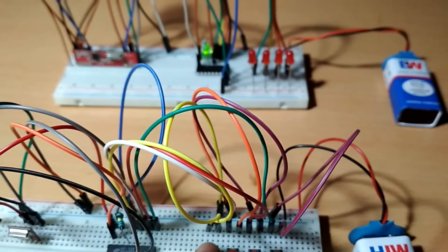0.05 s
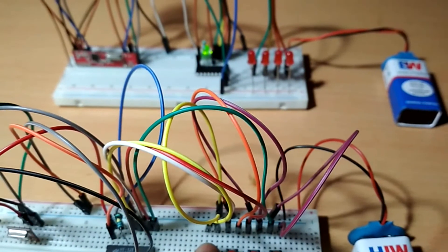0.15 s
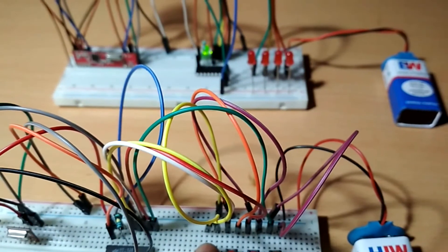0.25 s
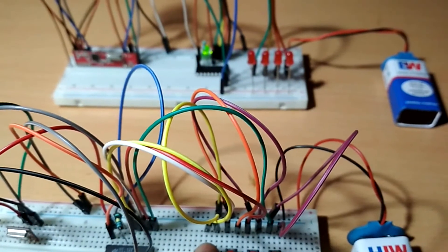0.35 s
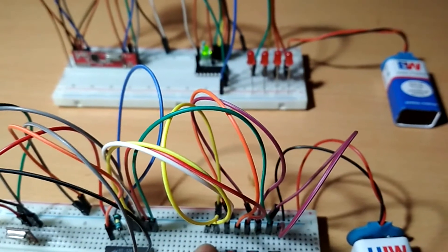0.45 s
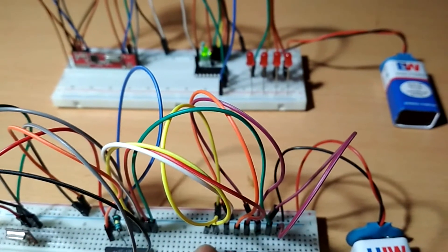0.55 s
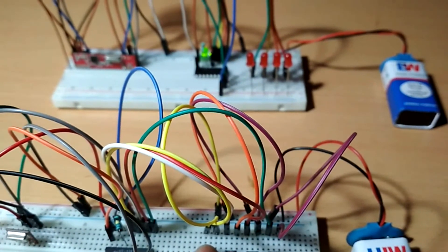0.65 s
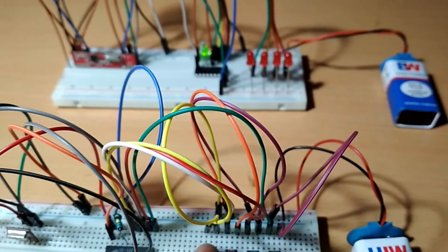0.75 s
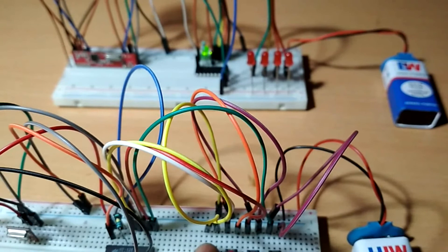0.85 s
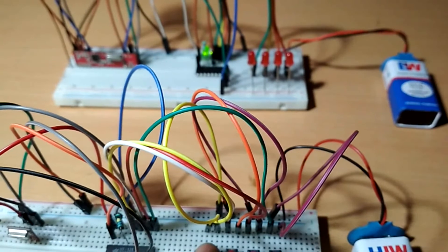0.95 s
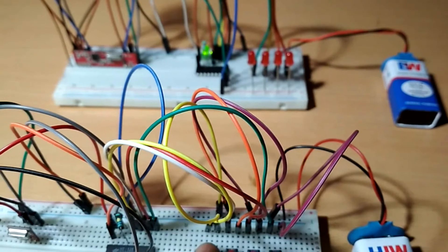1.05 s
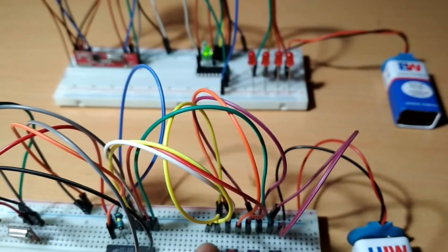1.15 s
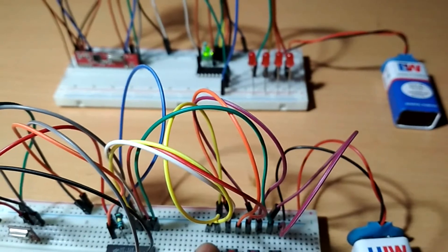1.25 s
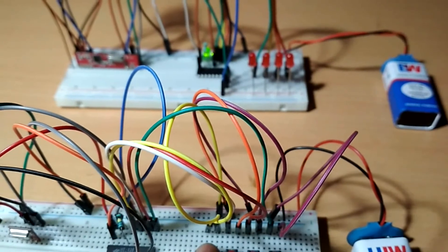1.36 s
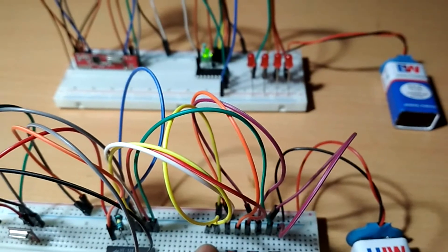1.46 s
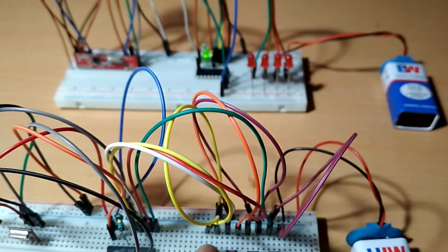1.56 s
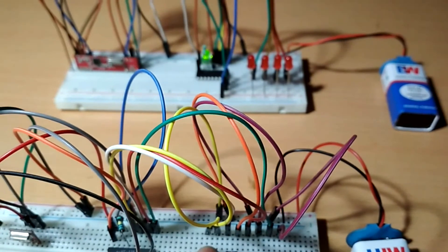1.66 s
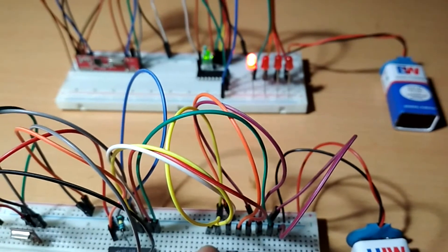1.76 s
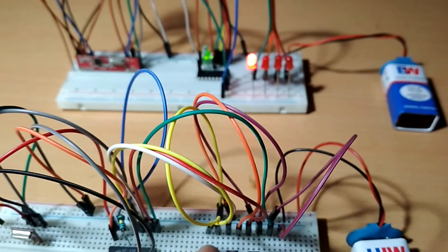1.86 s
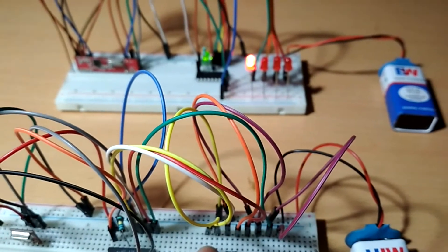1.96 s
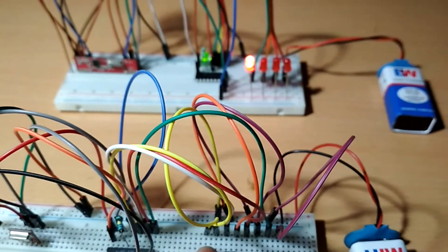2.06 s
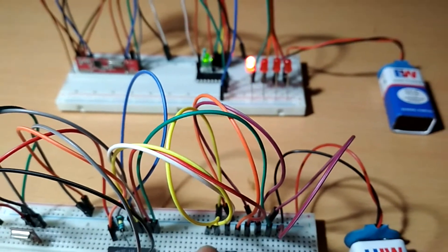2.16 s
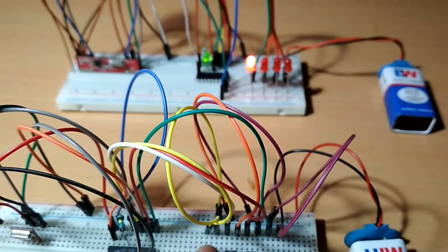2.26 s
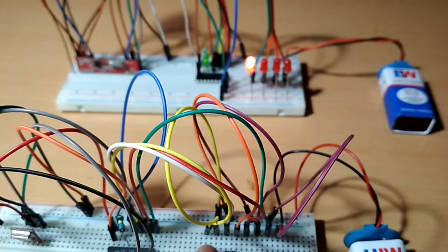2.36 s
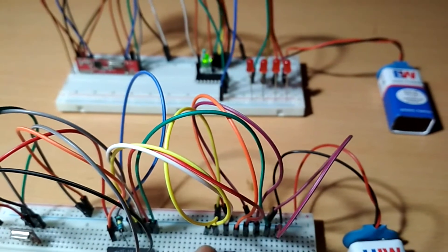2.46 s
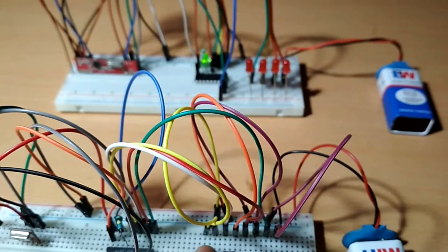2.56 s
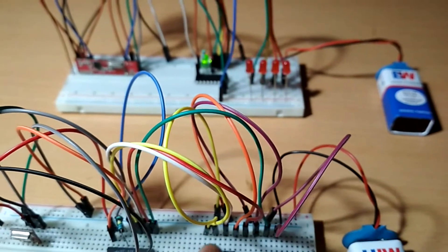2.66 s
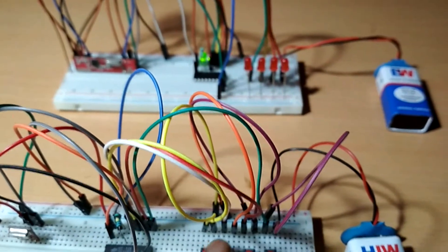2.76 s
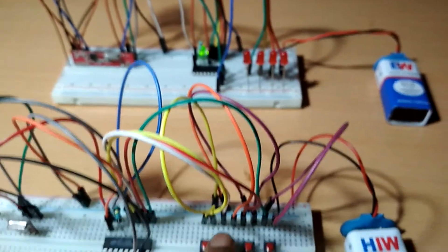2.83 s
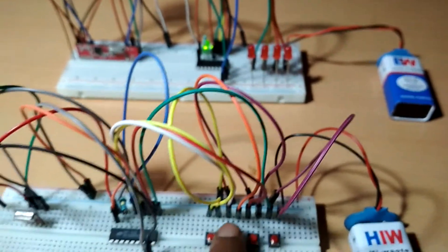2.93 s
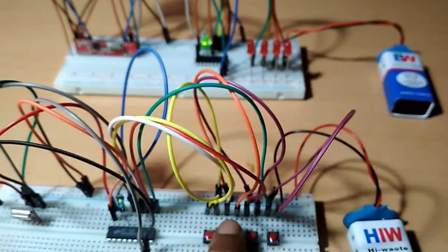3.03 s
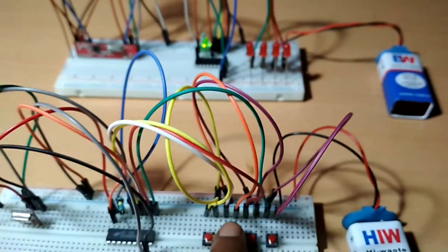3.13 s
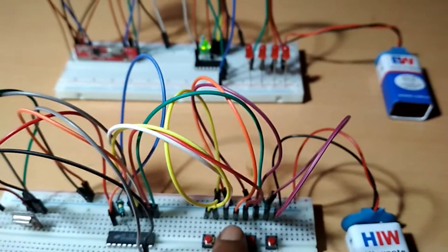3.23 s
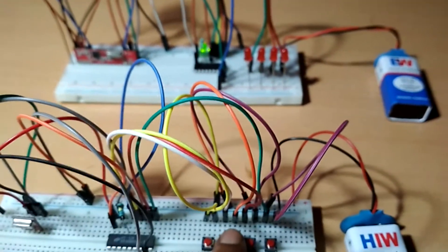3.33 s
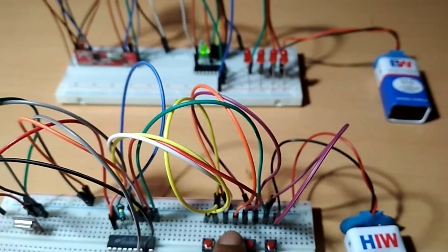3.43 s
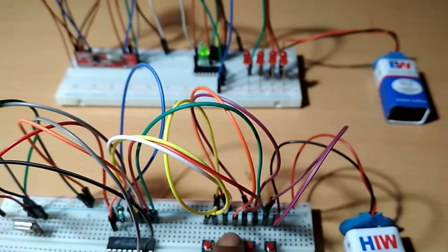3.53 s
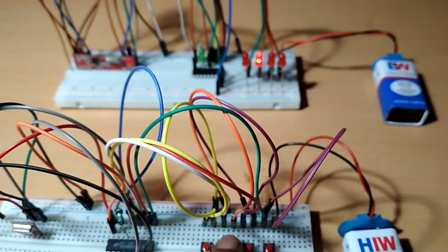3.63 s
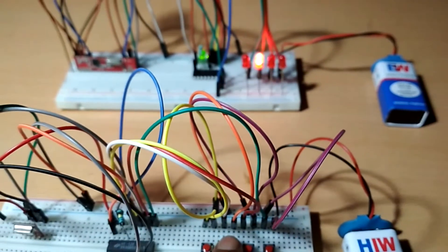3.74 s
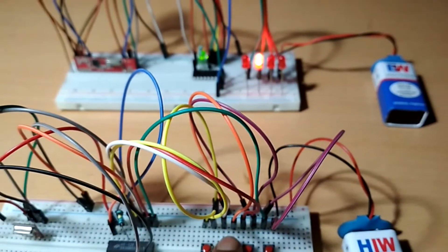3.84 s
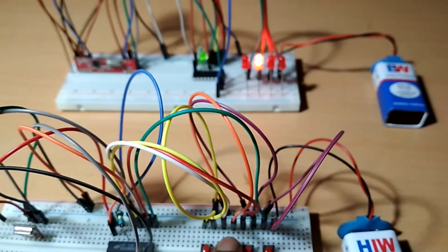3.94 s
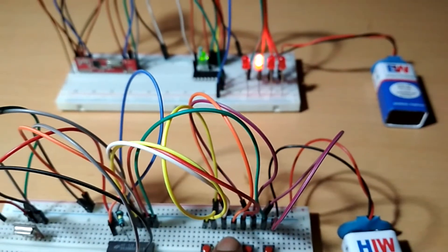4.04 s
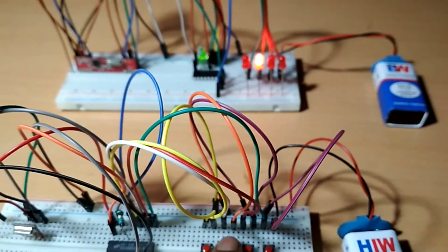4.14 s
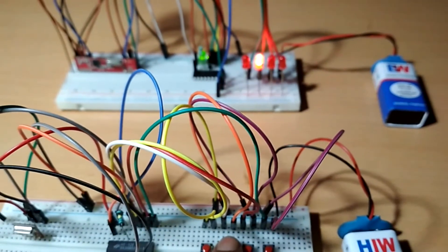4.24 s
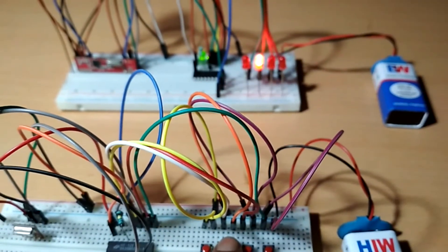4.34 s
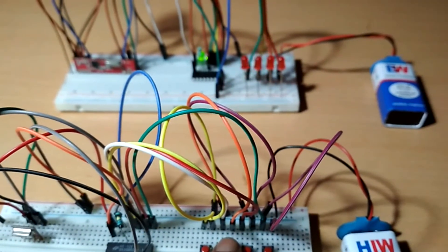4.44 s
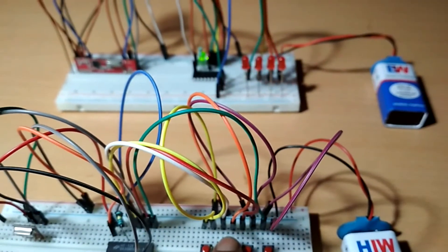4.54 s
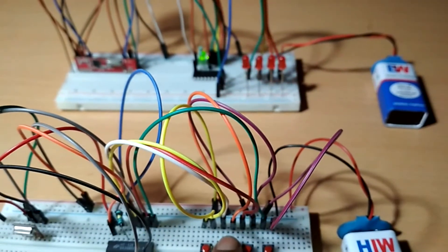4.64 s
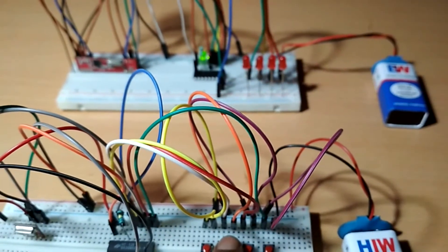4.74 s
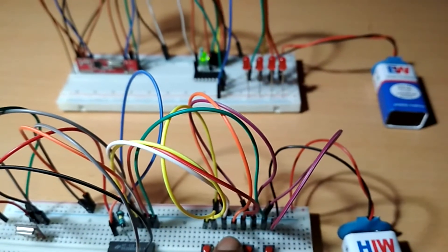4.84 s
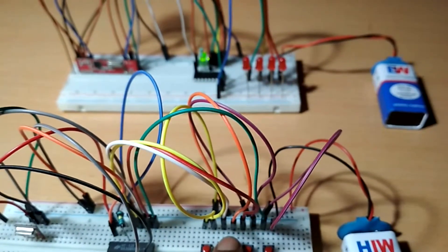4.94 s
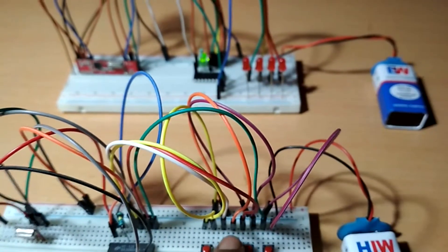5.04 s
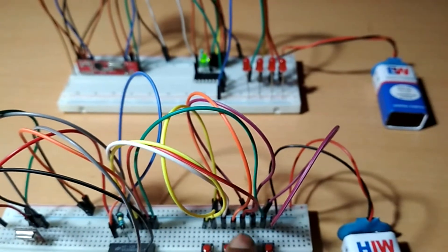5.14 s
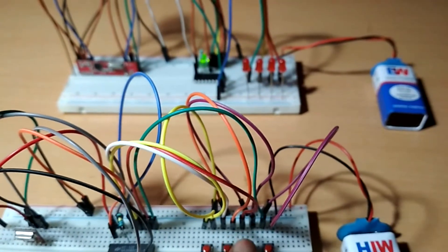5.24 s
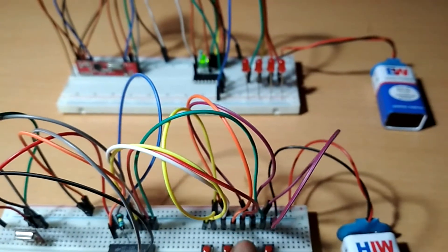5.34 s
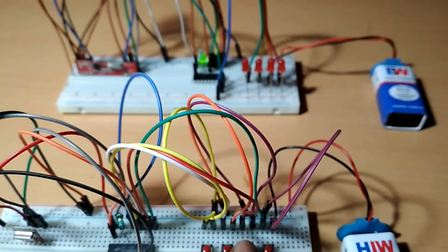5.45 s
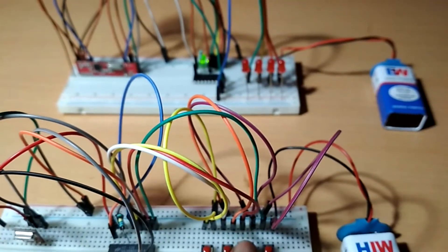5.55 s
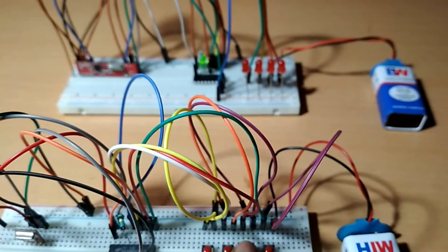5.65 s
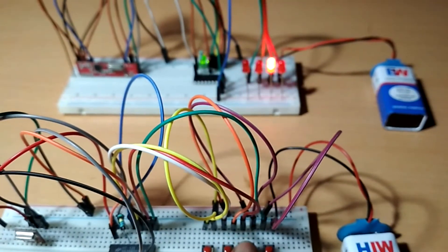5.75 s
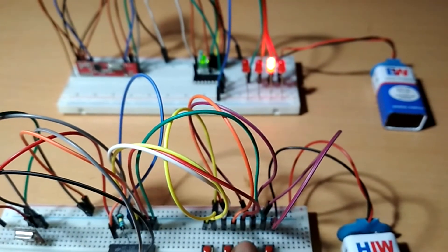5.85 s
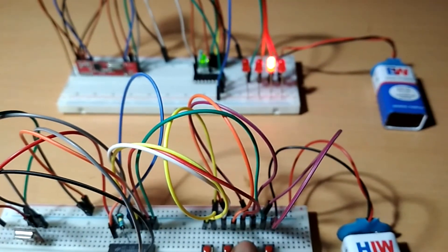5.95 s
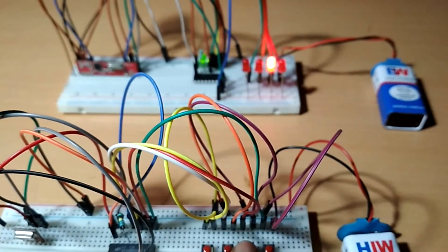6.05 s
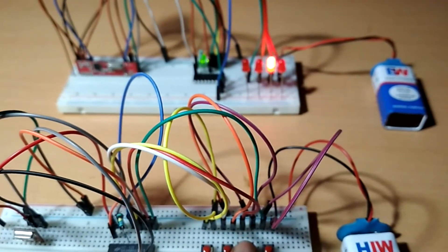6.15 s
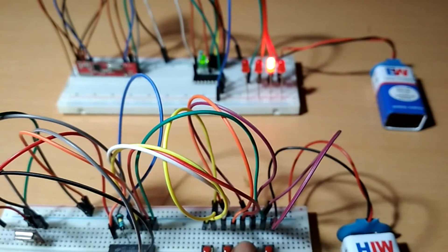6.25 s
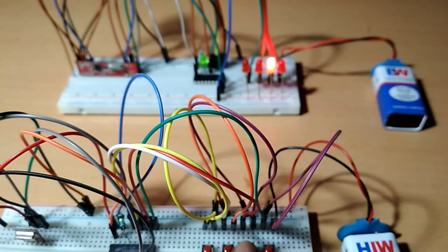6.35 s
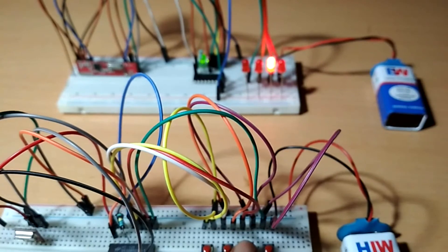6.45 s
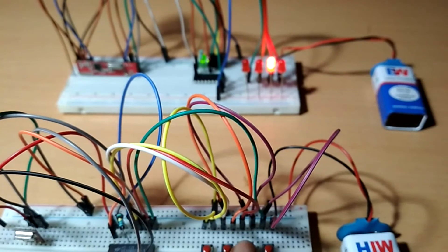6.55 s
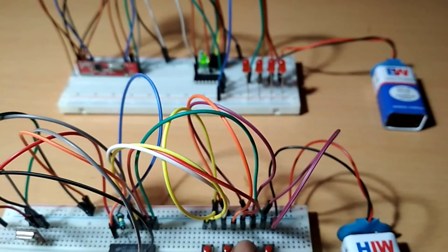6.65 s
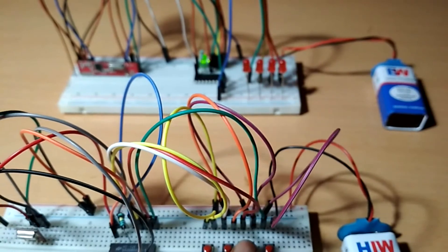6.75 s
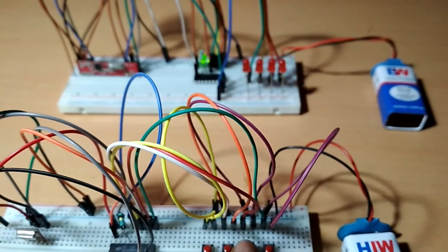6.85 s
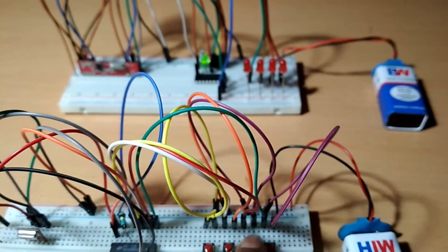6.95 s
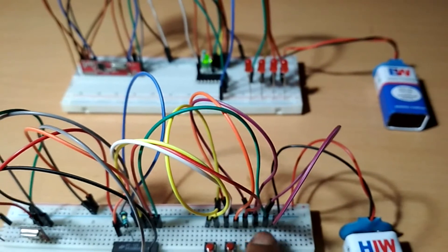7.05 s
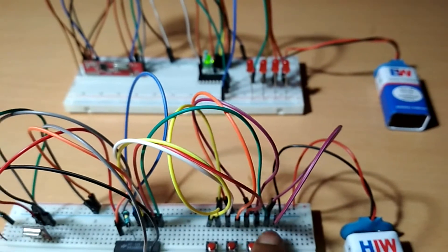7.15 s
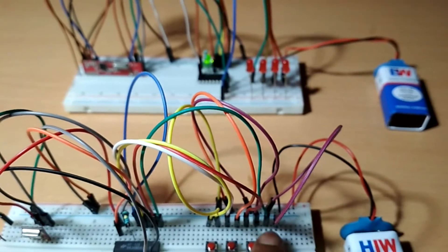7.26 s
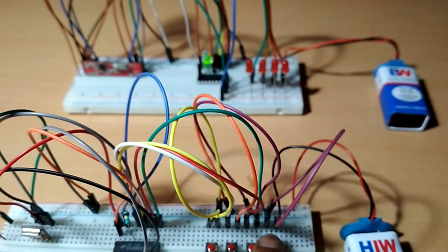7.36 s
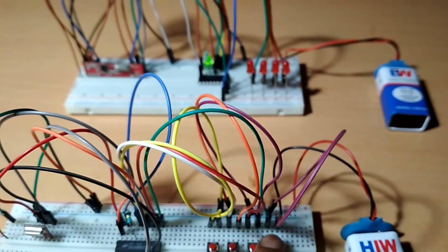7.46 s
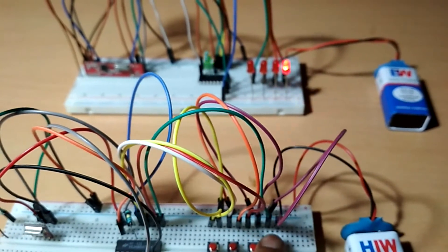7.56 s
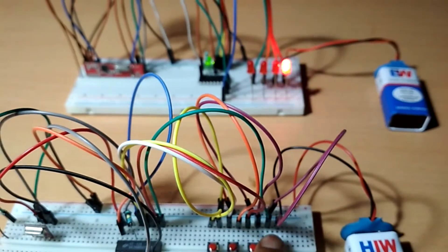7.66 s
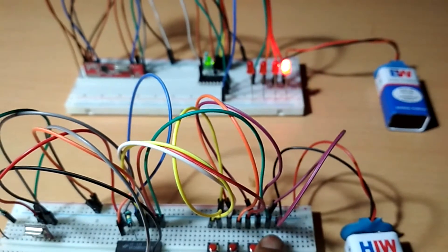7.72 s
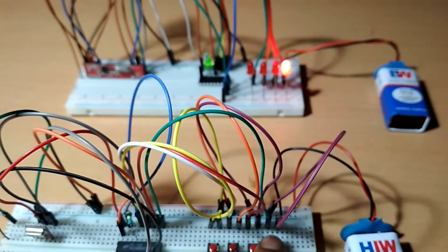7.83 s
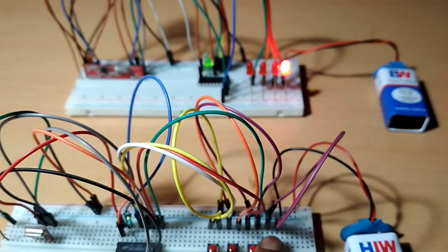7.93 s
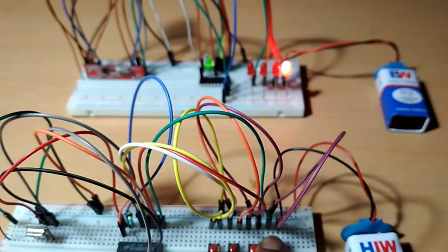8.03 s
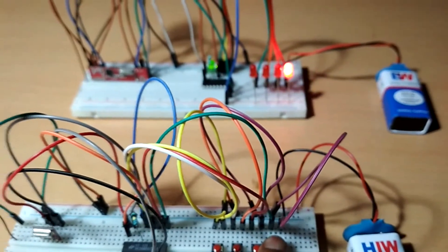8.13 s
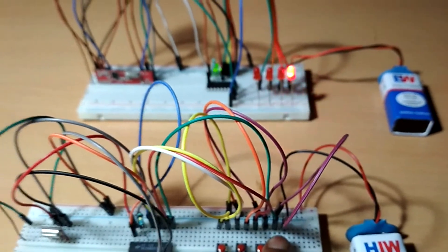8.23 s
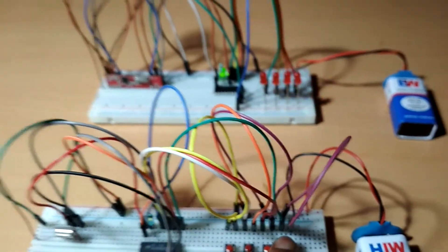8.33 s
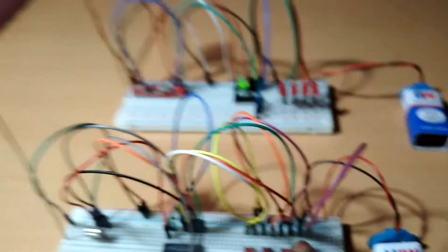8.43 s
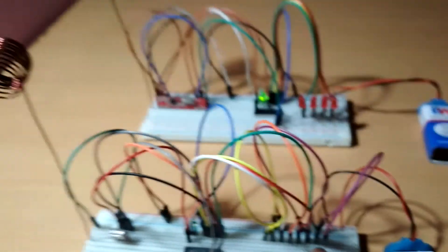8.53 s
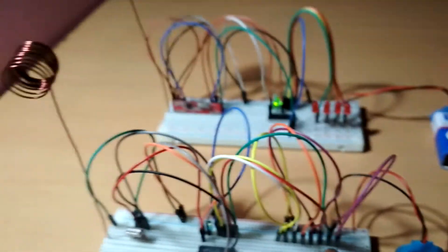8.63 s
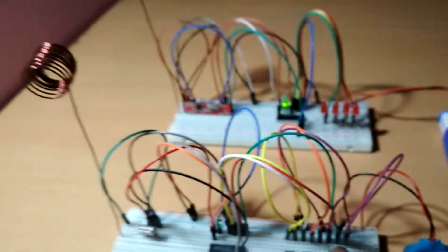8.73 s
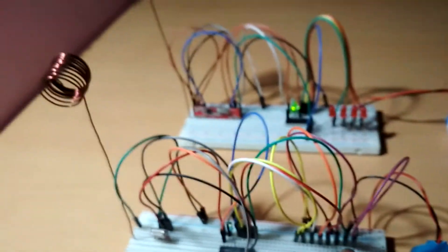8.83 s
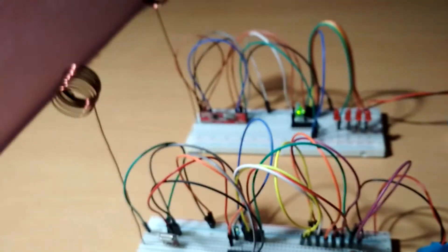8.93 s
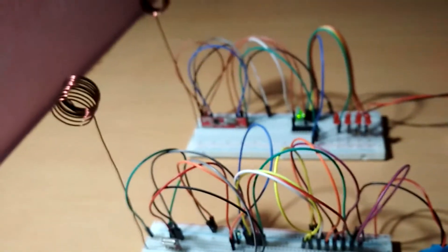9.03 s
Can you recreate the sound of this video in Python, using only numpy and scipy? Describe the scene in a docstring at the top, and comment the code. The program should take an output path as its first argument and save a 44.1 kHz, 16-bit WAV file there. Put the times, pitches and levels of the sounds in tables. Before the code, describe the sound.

Sharp, tiny dome-button clicks and quieter releases alternate in a quiet bare room, with soft microphone handling knocks, low rumble and light hiss.

```python
"""A finger presses and releases small dome push buttons on a plastic board lying on a wooden table.
Each snap sets dome, cap, board and table top ringing as dying sine waves; the crackle around it stirs dome
and cap, the board slightly. A bare room answers with a tail of shaped noise. A hand-held stereo microphone
adds soft grip knocks and hiss over rumble, low wavering hums, steady narrow bands and faint far-off tones."""
import sys
import numpy as np
from scipy import signal
from scipy.io import wavfile
from scipy.ndimage import uniform_filter1d, minimum_filter1d

SR = 44100
rng = np.random.default_rng(int(sys.argv[2]) if len(sys.argv) > 2 else 0)


def unload_wav(signal):
    """Save mono or channel-first audio to the path in sys.argv[1] as 16-bit WAV at rate SR, clipped to [-1, 1]."""
    wavfile.write(
        sys.argv[1],
        SR,
        np.round(np.clip(np.atleast_2d(signal).T, -1, 1) * 32767).astype(np.int16),
    )


N = 400869

# In every table a positive left-right level (pan_db) means louder on the left.
# Room air and microphone hiss, relative level: pitch_hz, level_db (per Hz)
AIR_SPECTRUM = [(110, -2.5), (160, -8), (220, -6), (330, -10), (410, -15.5), (520, -15.5), (650, -12),
                (950, -19.5), (1700, -14.5), (2500, -20.5), (6000, -24.5), (8000, -23), (10800, -20.5),
                (13500, -23.5), (15500, -41.5), (17000, -50)]
# How alike left and right hiss are: pitch_hz, likeness (0 to 1)
HISS_LIKENESS = [(60, 0.48), (180, 0.97), (550, 0.7), (1650, 0.051), (4970, 0.025), (15000, 0.02)]
# Which side the hiss leans to: pitch_hz, pan_db
HISS_LEANING = [(60, 2), (150, 1.5), (380, -2), (950, 4.5), (2380, 2.5), (5980, -1), (15000, -3.5)]
AIR_DB = -63.5   # rms level of the whole hiss
# Hand rumble, lower hum, upper hum at rest: pitch_hz, width_hz, level_db (rms)
LOWS_AT_REST = [(29, 11, -69), (79.4, 60.5, -62.5), (113.63, 8.2, -68)]
# Rises and dips of the low end: middle_s, length_s, rumble_rise_db, lower_hum_rise_db, upper_hum_rise_db
LOW_SWELLS = [(1.044, 0.23, 15, -4, 3.6), (1.783, 0.21, 3, -3, 8.9), (2.316, 0.67, 9, 5, 19.2),
              (2.928, 0.69, 18, 4.5, 5.2), (5.424, 0.26, -11, 7, 2.8), (7.09, 0.4, 7, -2.5, 0.82),
              (7.62, 0.3, 6.5, 4, 16.5), (8.86, 1, 3, 3, 4.5)]
# Steady narrow bands: pitch_hz, width_hz, level_db (rms)
DRONES = [(420, 19, -81), (652.4, 16, -81.5)]
# Grip knocks on the housing: start_s, level_db (peak of the plain knock, average of both sides), pitch_hz,
# pan_db, tick_db (relative to the knock)
GRIP_KNOCKS = [(0.576, -42.5, 190, 28, -23), (1.053, -54, 656, 29, -0.5), (1.203, -50, 151, 25, -5),
               (2.189, -35.5, 264, 33, -21), (2.534, -35.5, 240, 21, -15), (2.777, -48, 260, 26, -7.5),
               (5.214, -39, 1150, 29, -7.5), (6.759, -38.5, 252, -3, -24), (7.292, -47, 730, 31, -2),
               (8.178, -45.5, 184, 18, -11), (8.46, -45.5, 238, 23, -21)]
KNOCK_CYCLES = 4.6   # one pass through the knock's mode dies 60 dB in this many cycles
# Ringing modes of each part: pitch_hz, level_db (relative), t60_s (time to die 60 dB)
DOME_MODES = [(6570, -22, 0.00078), (6900, -1, 0.0023), (7950, 4, 0.0014), (9700, 0.5, 0.0013),
              (11160, -6.5, 0.0016), (10810, 0.5, 0.0019), (12550, -5.5, 0.0014), (14600, -1.5, 0.0026),
              (14870, 3, 0.0008), (14670, -10.5, 0.003)]
CAP_MODES = [(2650, 1, 0.0028), (3220, 0.5, 0.0056), (3860, -4, 0.011), (4520, -1, 0.0076),
             (5640, 4, 0.0022)]
BOARD_MODES = [(910, -25, 0.007), (1154, -0.5, 0.0081), (1523, 3.5, 0.018), (1725, 2, 0.015),
               (2005, 2.5, 0.018)]
BOARD_LOW_MODES = [(540, 3.2, 0.0084), (760, -8.5, 0.019)]
TABLE_MODES = [(121, -1, 0.02), (268.4, 8, 0.098), (285.5, 10, 0.023), (314, 5, 0.12), (352, 1.5, 0.061),
               (406.5, -1.05, 0.096)]
# Dome snaps, one row each; pitch factors multiply the modes, room levels are relative to the direct sound:
# snap_s, pan_db, dome_db, dome_tilt (dB per octave), dome_pitch (factor),
# cap_db, cap_tilt (dB per octave), cap_pitch (factor),
# board_db, board_tilt (dB per octave), board_pitch (factor), low_db, low_pitch (factor, low board modes),
# table_db, region_hz (favoured on the table), room_db of button, of board, of table,
# lead_ms (rising crackle before the snap), crackle_db (relative to the snap), second_db (second snap to first)
PRESS_SNAPS = [(1.7398, -9, -8, 8.5, 0.97, -26.5, -4.3, 1.04, -35, -13, 1.04, -45, 0.88, -39, 300, -6.5, 1.5, -6, 3.17, -1.5, -3),
               (3.6762, -12.5, -4.5, 8, 1.03, -25, 3.5, 1.07, -35.5, 0.5, 1.016, -59, 1.5, -35, 320, -7.5, 0.5, -7.5, 2.9, -3, -5),
               (5.7187, -8, -8.5, 3.5, 0.978, -28.5, 0.5, 1.15, -37.5, 4.5, 1.035, -45, 0.95, -36, 360, -6, 0, 0.5, 5.0, -2.5, -1),
               (7.5937, 1, -1, 5.5, 0.95, -22.5, 2, 1.04, -34.5, 8, 1.075, -29, 1.14, -31, 320, -9, -3.5, -2, 3.3, -4, -1)]
# Snaps of the domes let go, and one faint stray snap at 5.13 s: same columns as the presses
RELEASE_SNAPS = [(2.4400, -4.5, -17, 2, 0.98, -35, 2.5, 1.05, -44.5, -23, 1.05, -39, 1.01, -36.5, 242, -4.5, 2.5, -7.5, 3.0, -2, -3.5),
                 (4.4537, -5.5, -16, 0.66, 0.96, -33.5, 10, 0.967, -44, -11, 1.026, -50, 1.06, -38, 234, -4, 3.5, -3, 4.5, -4.5, -9),
                 (5.1304, -6, -29.5, 2.7, 1.1, -66, 0.1, 1.2, -70, 2, 1.02, -70, 0.94, -67, 260, -4.5, 5, -3, 24, 2, -4),
                 (6.7015, -5, -40, 19, 0.99, -67, 3, 0.96, -51, -2, 1.03, -58, 1.4, -34.5, 272, -10.5, -5.5, -7, 1.2, 6, -5),
                 (8.2818, -9, -13, 0.5, 0.97, -40.5, 11, 1.18, -59, -16, 1.08, -47.5, 1.01, -31, 287, -9, 2, -3.5, 3.7, -10, -4)]
SECOND_SNAP_MS, CRACKLE_PAN_DB = 1.65, 14   # every snap repeats this soon; the crackle leans left of the snap
BOARD_PAN_DB = 1   # left-right level of the board
TABLE_REGION_HZ = 187   # width of the favoured region
# Bounces off the parts round the dome: delay_ms
BOUNCES_MS = (0.09, 0.16, 0.25)
# The hand shades the right port from the button: pitch_hz, width_hz, level_db (negative is a dip)
HAND_SHADOW = (7400, 3600, -5)
# Resonance of each microphone port: pitch_hz, width_hz, boost_db
LEFT_PORT = (1120, 1060, 10.06)
RIGHT_PORT = (11170, 3600, 11.9)
# How long the room tail takes to die 60 dB, before its extra late fade: pitch_hz, t60_s
ROOM_T60 = [(150, 0.43), (400, 0.28), (1200, 0.2), (4000, 0.22), (10000, 0.22), (16000, 0.19)]
# How alike left and right room tails are: pitch_hz, likeness (0 to 1)
TAIL_LIKENESS = [(200, 0.93), (500, 1), (1200, 0.24), (4000, 0.26)]
# Relative colour of the room tail: pitch_hz, left_db, right_db
TAIL_COLOUR = [(300, -1.5, -1.5), (915, 0.8, 7.2), (1684, -3, 0.1), (3300, 2, 8), (5400, 0.9, 2.5),
               (8500, -3, -8.6), (10800, -5, -1.5), (15000, -2.5, -2)]
# Faint far-off narrow tones: start_s, length_s, pitch_hz, level_db (rms at full swell, before panning)
FAR_TONES = [(4.155, 0.19, 1750, -66), (6.156, 0.29, 1474, -67), (7.86, 0.22, 1080, -66.5),
             (8.594, 0.075, 1100, -67)]
CUTOFF_HZ = 17050   # from here up, the final filter takes away at least 90 dB


def from_db(db):
    """Turn decibels into a gain."""
    return 10 ** (np.asarray(db) / 20)


def rms_one(x):
    """Scale a sound to an rms level of 1."""
    return x / np.sqrt(np.mean(x ** 2) + 1e-20)


def at_hz(points, hz):
    """Read a table between its points, spacing pitch by octaves as the ear does."""
    points = np.array(points)
    return np.interp(np.log(hz), np.log(points[:, 0]), points[:, 1])


def sides(pan_db):
    """Left and right gains for a level difference, half of it on each side."""
    return from_db(np.multiply.outer([.5, -.5], pan_db))


def ring(clicks, hz, t60):
    """A struck mode: each unit click starts a dying sine of height 1."""
    decay = from_db(-60 / (t60 * SR))   # gain per sample
    w = 2 * np.pi * hz / SR
    feedback = [1, -2 * decay * np.cos(w), decay * decay]
    return signal.lfilter([0, np.sin(w)], feedback, clicks + 1e-18)


def resonance(x, hz, width_hz):
    """A resonance lets a band through, with a gain of 1 at its top."""
    r = np.exp(-np.pi * width_hz / SR)
    feedback = [1, -2 * r * np.cos(2 * np.pi * hz / SR), r * r]
    return signal.lfilter(np.array([1, 0, -1]) * (1 - r * r) / 2, feedback, x)


def bands(white, low_hz):
    """Cut noise into third-octave bands, dealt in turn from two unrelated noises."""
    count = int(3 * np.log2(18000 / low_hz)) + 1
    edges = low_hz * 2 ** (np.arange(count) / 3)
    for k, (low, high) in enumerate(zip(edges, edges[1:])):
        band = signal.butter(2, [low, high], "band", fs=SR, output="sos")
        yield np.sqrt(low * high), signal.sosfilt(band, white[k % 2])


def hiss():
    """Room air and microphone hiss: noise alike in the bass, almost unrelated in the treble."""
    out = 0
    for hz, (mid, side) in bands(rng.standard_normal((2, 2, N)), 120.0):
        alike = np.clip(at_hz(HISS_LIKENESS, hz), 0, 1)
        pair = np.sqrt(1 + alike) * mid + np.sqrt(1 - alike) * side * [[1], [-1]]
        out = out + from_db(at_hz(AIR_SPECTRUM, hz)) * sides([at_hz(HISS_LEANING, hz)]) * pair
    return from_db(AIR_DB) * rms_one(out)


def lows():
    """Hand rumble and two wavering hums: narrow noise, nearly alike on both sides, with bell-shaped rises."""
    middle_s, length_s, *rises_db = np.transpose(LOW_SWELLS)
    place = (np.arange(N) / SR - middle_s[:, None]) / length_s[:, None]
    bells = np.cos(np.pi * np.clip(place, -.5, .5)) ** 2
    out = 0
    for rise_db, (hz, width_hz, rest_db) in zip(rises_db, LOWS_AT_REST):
        noise = resonance(rng.standard_normal((2, N)), hz, width_hz)
        mid, side = resonance(noise, hz, 0.53 * width_hz)
        pair = rms_one(mid + 0.15 * side * [[1], [-1]])
        out = out + from_db(rest_db + rise_db @ bells) * pair   # a negative rise is a dip
    return out


def drones():
    """Steady narrow bands of noise that stand a little out of the room air."""
    out = 0
    for hz, width_hz, level_db in DRONES:
        band = resonance(resonance(rng.standard_normal(N), hz, width_hz), hz, width_hz)
        out = out + from_db(level_db) * rms_one(band)
    return out


def knocks():
    """Soft touches ring the housing briefly, usually much louder at one port, each with its own amount of tick."""
    out = np.zeros((2, N))
    for start_s, peak_db, hz, pan_db, tick_db in GRIP_KNOCKS:
        t60 = KNOCK_CYCLES / hz
        click = np.zeros(SR // 5)
        click[round(.003 * SR)] = 1
        knock = ring(ring(click, hz, t60), hz, t60)   # twice through the mode: a rounded onset
        tick = ring(click, 1760, 0.016) - ring(click, 1080, 0.0096) + ring(click, 600, 0.017)
        knock = knock / np.abs(knock).max() + from_db(tick_db) * tick
        left_right = sides(pan_db) / np.mean(sides(pan_db))
        start = round(start_s * SR)
        out[:, start:start + len(click)] += from_db(peak_db) * np.outer(left_right, knock)
    return out


def crackle_clicks(t, lead):
    """Random crackle on each side builds up to the snap, then dies out."""
    crackle = rng.standard_normal((2, len(t))) * (rng.random((2, len(t))) < .3)
    crackle = crackle * np.where(t < lead, t / lead, from_db(-60 * (t - lead) / (0.01104 * SR)))
    return crackle / np.sqrt(np.sum(crackle ** 2, axis=1, keepdims=True) + 1e-9)   # the energy of one click


def struck(modes, level_db, spread_db, tilt_db=0, pitch=1, crackle_share=1):
    """Snap, second snap and a share of crackle strike each mode; each port gets its own random snap level."""
    out, t = np.zeros((len(level_db), 2, SR // 3)), np.arange(SR // 3)
    middle_hz = np.exp(np.mean(np.log(np.array(modes)[:, 0])))
    each = np.ones(len(level_db))
    snaps = PRESS_SNAPS + RELEASE_SNAPS
    for sound, row, db, tilt, factor in zip(out, snaps, level_db, tilt_db * each, pitch * each):
        *_, lead_ms, crackle_db, second_db = row
        lead = round(lead_ms * SR / 1000)
        second = lead + round(SECOND_SNAP_MS * SR / 1000)
        crackle = crackle_clicks(t, lead)
        for k, (hz, mode_db, t60) in enumerate(modes):
            blow = crackle_share * from_db(crackle_db) * crackle * sides([CRACKLE_PAN_DB])
            snap_db = np.array([0, second_db]) + spread_db * rng.standard_normal((2, 2))
            blow[:, [lead, second]] = from_db(snap_db)
            gain = (-1) ** k * from_db(db + mode_db + tilt * np.log2(hz / middle_hz))
            sound += gain * ring(blow, hz * factor, t60)
    return out


def smeared(x):
    """Nearby parts throw the snap back and forth: all-pass loops spread it in time without colouring it."""
    for ms in BOUNCES_MS:
        loop = np.zeros(round(ms * SR / 1000) + 1)
        loop[[0, -1]] = 1, -.6
        x = signal.lfilter(loop[::-1], loop, x)
    return x


def room(x):
    """Echoes thicken into a noise tail dying band by band, new for each snap, most alike in the lower bands."""
    t = np.arange(x.shape[-1]) / SR
    uneven = from_db(3.0 * rng.standard_normal(x.shape))
    lumpy = uneven * (rng.random(x.shape) < .03 + 4 * t)   # sparse echoes at first, then ever denser
    tail = 0
    for hz, pair in bands(rng.standard_normal((2, *x.shape)) * lumpy, 92.2):
        # even out each band of the tail across snaps; room_db sets how strongly each is heard
        early = np.mean(pair[..., :SR // 10] ** 2, axis=2, keepdims=True)
        pair = pair * np.sqrt(np.mean(early) / early)
        alike = np.clip(at_hz(TAIL_LIKENESS, hz), 0, 1)
        right = alike * pair[:, 0] + np.sqrt(1 - alike ** 2) * pair[:, 1]
        pair = np.stack([pair[:, 0], right], axis=1)
        # leave out the other side's column to read one side
        colour_db = [[at_hz(np.delete(TAIL_COLOUR, other, axis=1), hz)] for other in (2, 1)]
        tail = tail + pair * from_db(colour_db - 60 * t / at_hz(ROOM_T60, hz))
    tail = tail * np.clip(t / 0.00373, 0, 1)   # the first walls answer after a moment
    tail = tail * from_db(-4.0 * (t / 0.32) ** 4)   # the far end falls away faster
    tail = tail / np.sqrt(np.mean(np.sum(tail ** 2, axis=2)))
    return signal.fftconvolve(x, tail, axes=2)[..., :len(t)]


def through_port(x, port):
    """A microphone port boosts the sound around its own resonance."""
    hz, width_hz, boost_db = port
    return x + (from_db(boost_db) - 1) * resonance(x, hz, width_hz)


def buttons():
    """Dome, cap, board and table ring, direct and through the room, and pass the two microphone ports."""
    (snap_s, pan_db, dome_db, dome_tilt, dome_pitch, cap_db, cap_tilt, cap_pitch, board_db, board_tilt, board_pitch,
     low_db, low_pitch, table_db, region_hz, *room_db, lead_ms, _, _) = np.transpose(PRESS_SNAPS + RELEASE_SNAPS)
    dome = smeared(struck(DOME_MODES, dome_db, spread_db=1.5, tilt_db=dome_tilt, pitch=dome_pitch))
    no_lows = signal.butter(4, 4500, "high", fs=SR, output="sos")
    dome = signal.sosfilt(no_lows, dome)   # too small to radiate lows
    button = dome + struck(CAP_MODES, cap_db, spread_db=1.5, tilt_db=cap_tilt, pitch=cap_pitch)
    board = struck(BOARD_MODES, board_db, spread_db=2.0, tilt_db=board_tilt, pitch=board_pitch, crackle_share=0.2)
    board = board + struck(BOARD_LOW_MODES, low_db, spread_db=4.0, pitch=low_pitch, crackle_share=0)
    table = struck(TABLE_MODES, table_db, spread_db=.6, crackle_share=0)
    # each spot on the table favours some modes
    table = np.array([resonance(x, hz, TABLE_REGION_HZ) for x, hz in zip(table, region_hz)])

    hz, width_hz, shade_db = HAND_SHADOW
    shade = (from_db(shade_db) - 1) * resonance(button, hz, width_hz) * [[0], [1]]   # right side only
    direct = (button + shade) * sides(pan_db).T[..., None] + board * sides([BOARD_PAN_DB]) + table
    to_room = sum(from_db(db)[:, None, None] * x for db, x in zip(room_db, (button, board, table)))
    snaps = direct + room(to_room)

    air = np.zeros((2, N))
    starts = np.round((snap_s - lead_ms / 1000) * SR).astype(int)   # crackle begins before the snap
    for start, snap in zip(starts, snaps):
        air[:, start:start + snap.shape[1]] += snap
    air[1] = np.roll(air[1], -1)   # the right port is a little nearer: one sample earlier
    return np.array([through_port(x, port) for x, port in zip(air, (LEFT_PORT, RIGHT_PORT))])


def far_tones():
    """Narrow bands of noise that swell and fade like faint tones, leaning left."""
    out, t = np.zeros((2, N)), np.arange(N) / SR
    for start_s, length_s, hz, level_db in FAR_TONES:
        tone = rms_one(resonance(resonance(rng.standard_normal((2, N)), hz, 200), hz, 200))
        arch = np.sin(np.pi * np.clip((t - start_s) / length_s, 0, 1)).clip(0)
        out += from_db(level_db) * tone * np.sqrt(arch) * sides([5.0])
    return out


def scene():
    """Everything at the two microphone ports, added together."""
    return buttons() + knocks() + far_tones() + lows() + drones() + hiss()


def record(dry):
    """A fast look-ahead limiter turns peaks down, then a steep filter cuts the top of the treble."""
    top = .7
    allowed = minimum_filter1d(top / np.maximum(np.abs(dry), top), size=61, axis=1)
    held = dry * uniform_filter1d(allowed, size=31, axis=1)
    return signal.sosfilt(signal.cheby2(14, 90, CUTOFF_HZ, fs=SR, output="sos"), held)


dry = scene()
out = record(dry)
unload_wav(out)
```